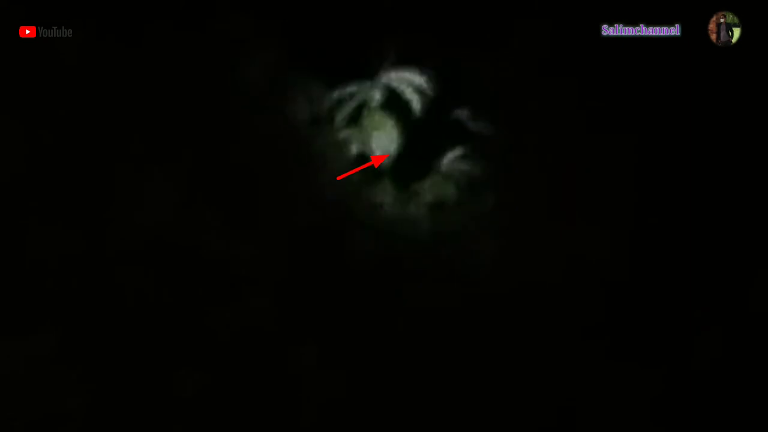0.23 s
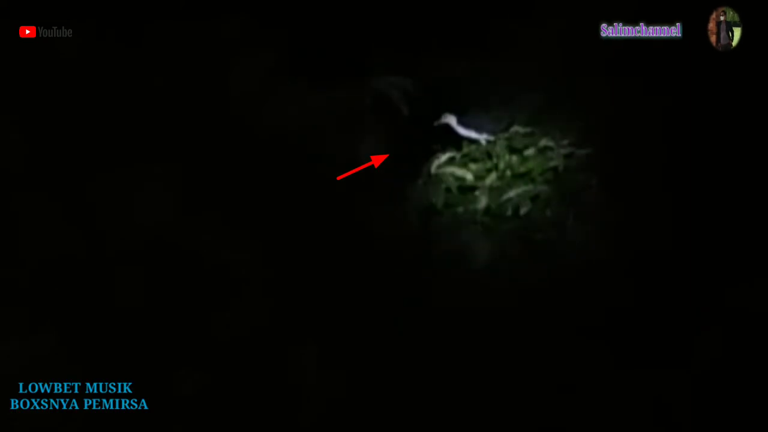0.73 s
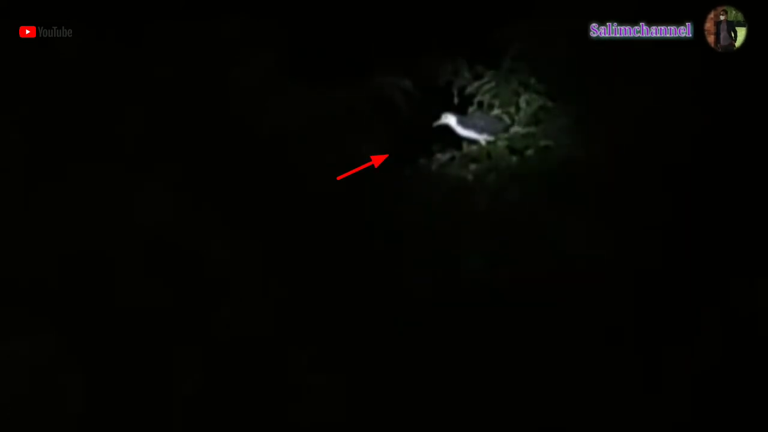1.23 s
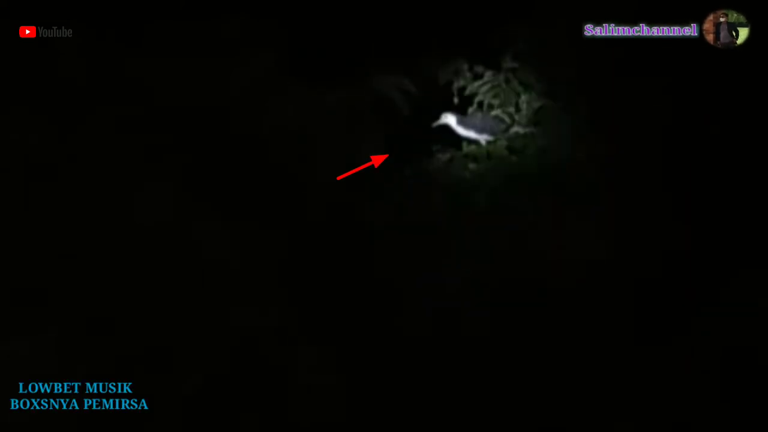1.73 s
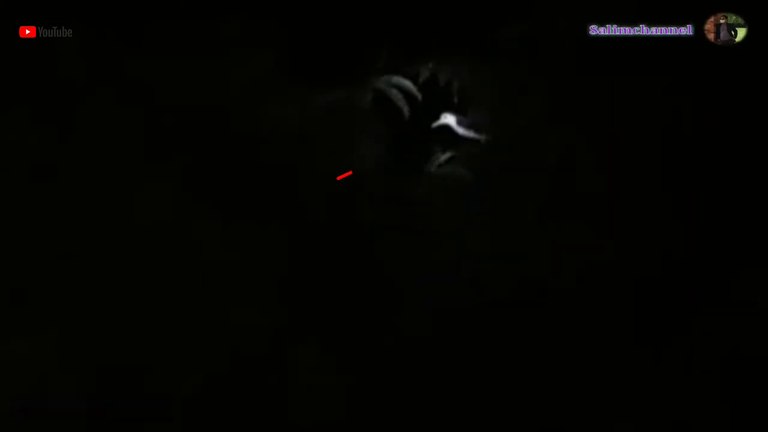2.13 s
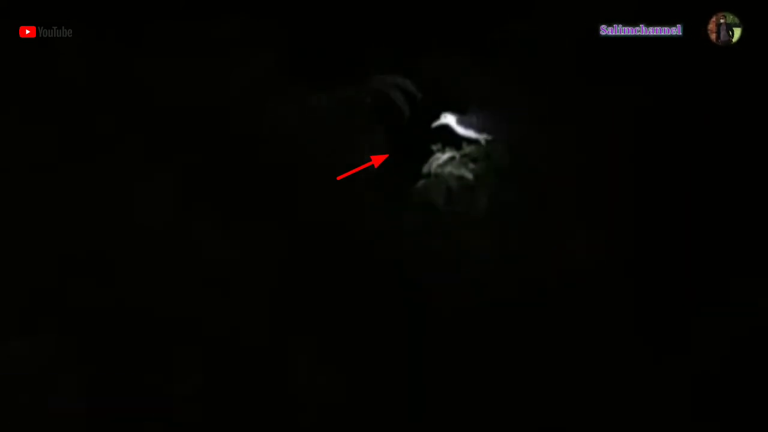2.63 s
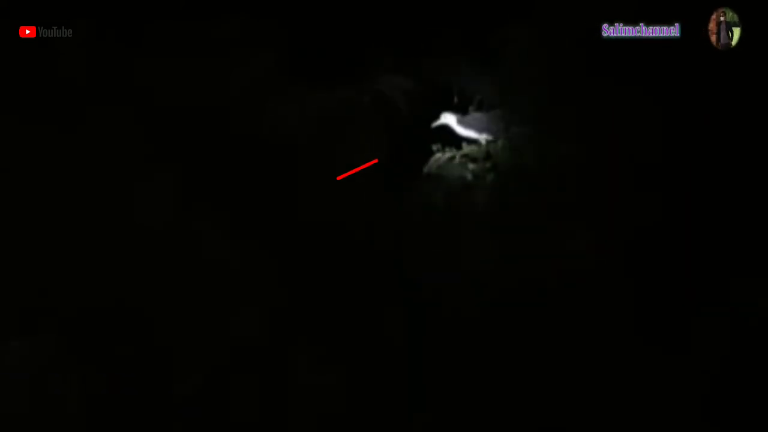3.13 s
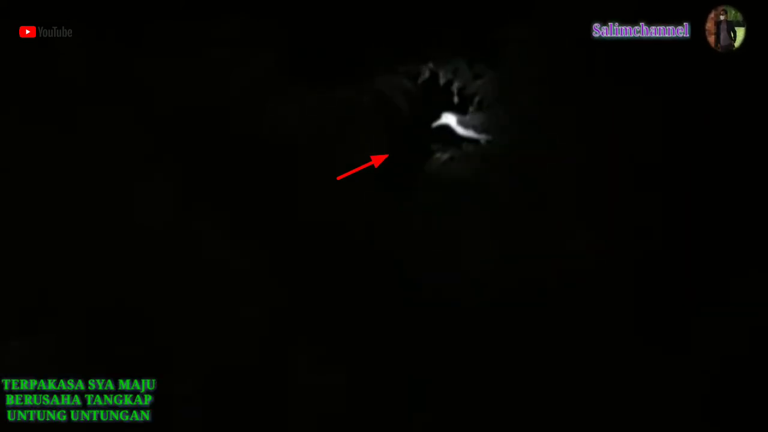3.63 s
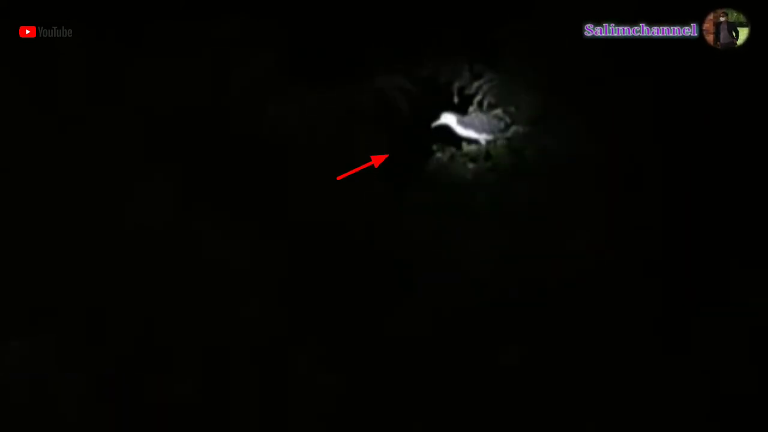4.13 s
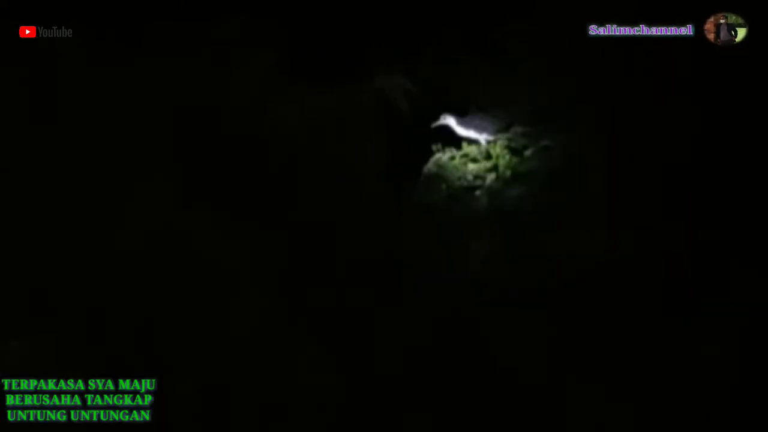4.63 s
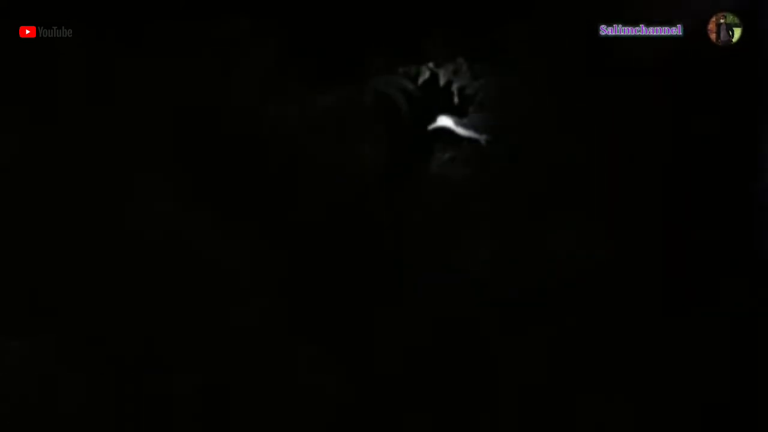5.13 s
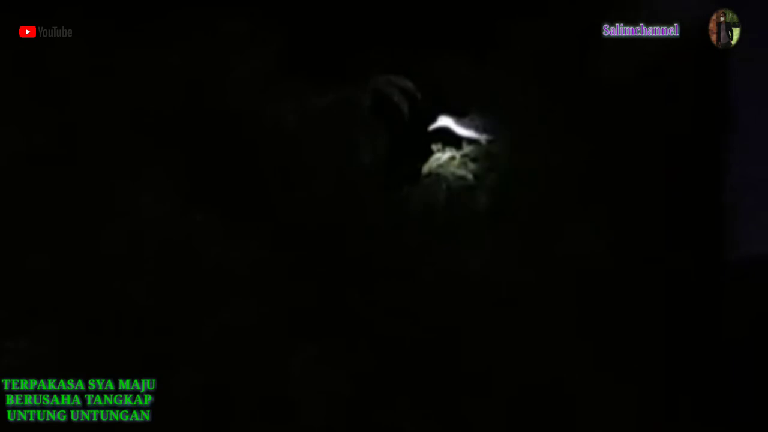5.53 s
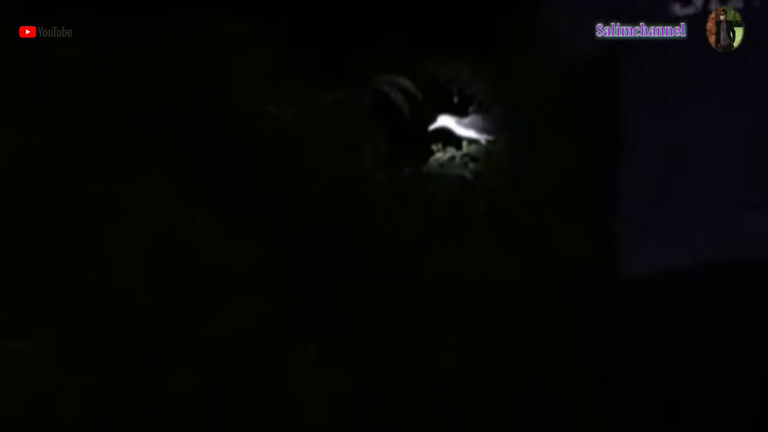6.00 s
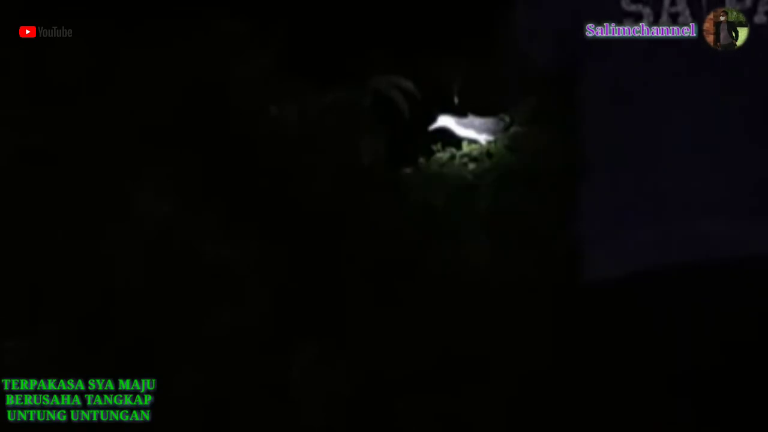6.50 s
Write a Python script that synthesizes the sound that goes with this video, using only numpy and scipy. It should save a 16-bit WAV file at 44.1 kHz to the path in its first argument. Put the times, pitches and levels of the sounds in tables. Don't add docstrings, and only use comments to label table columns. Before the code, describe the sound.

A night pond edge, heard through a coarse mono phone microphone. From 0 to 7 seconds, a dense shimmering chorus of distant insects, strongest around 6 kHz, sits over a deep, gently swelling traffic rumble and soft hiss. Tree crickets pulse quickly and unevenly; a thin katydid buzz sets in around 0.4. Close taps at 0.2 and 0.4, a dull knock at 1.5, and grainy cloth rubs occupy the first two seconds. A low cricket trills at 0.3; quick higher chirps run at 0.75-1.25 and 2.3-2.8, faintly again near 4.8-5.1. Slower chirps come at 1.5-2.1 and 6.4-6.6, mid-pitched trills at 0.7, 1.7, 3.4, 4.2 and 5.6, and farther chirps at 5.2-5.6. A distant engine rises at 0.8-1.7, 1.8-3.4 and, weaker, 3.8-5. A tiny fluttering squeak rises at 6.6.

```python
import sys
import numpy as np
from scipy import signal
from scipy.fft import rfft, irfft
from scipy.io import wavfile
from scipy.ndimage import uniform_filter1d

SR = 44100
rng = np.random.default_rng(int(sys.argv[2]) if len(sys.argv) > 2 else 0)


def unload_wav(signal):
    wavfile.write(
        sys.argv[1],
        SR,
        np.round(np.clip(np.atleast_2d(signal).T, -1, 1) * 32767).astype(np.int16),
    )


def voltage_ratio(level):
    return 10 ** (np.asarray(level, float) / 20)


N = 298116


def rms_one(x):
    return x / np.sqrt(np.mean(x ** 2) + 1e-20)


def drift(rate_hz):
    r = np.exp(-80 * np.pi * rate_hz / SR)
    slow = signal.lfilter([1], [1, -2 * r, r * r], rng.standard_normal(N // 40 + 2002))[2000:]
    return np.interp(np.arange(N) / 40, np.arange(len(slow)), rms_one(slow))


def coloured(x, spectrum):
    hz, db = np.transpose(spectrum)
    log_hz = np.log(np.maximum(np.fft.rfftfreq(N, 1 / SR), 1))
    gain = voltage_ratio(np.interp(log_hz, np.log(hz), db, left=-90, right=-90))
    return rms_one(irfft(rfft(x) * gain, N))


def stroke(start_hz, end_hz, length_s):
    part = np.linspace(0, 1, round(length_s * SR))
    hz = start_hz + (end_hz - start_hz) * part ** 1.25
    return np.sin(np.pi * part) ** 1.3 * np.sin(2 * np.pi * np.cumsum(hz) / SR)


def play(clicks, shape):
    return signal.oaconvolve(clicks, shape)[:N]


def foliage(x):
    t60_s = .12
    t = np.arange(SR // 2) / SR
    tail = rng.standard_normal(len(t)) * voltage_ratio(-60 * t / t60_s)
    return play(x, tail / np.sqrt(np.sum(tail ** 2)))


def far_chorus():
    # start pitch in Hz, end pitch in Hz, pitch spread in Hz, stroke length in seconds,
    # strokes per second, level in dB, throb in dB.
    crowds = [
        (3668, 3260, 140, .02, 250, -56.5, 1.5),
        (4874, 4350, 190, 0.013, 400, -61, 0),
        (5653, 5480, 55, 0.0091, 200, -52.5, -2.8),
        (6000, 5700, 130, 0.0104, 300, -48.5, 0.5),
        (6284, 6010, 75, .016, 250, -46, 0.5),
        (6560, 6300, 110, .012, 250, -52, -1),
        (6780, 6520, 30, 0.013, 300, -61.5, -1.5),
        (8424, 7900, 263, 0.0042, 900, -53.5, -0.5),
        (9360, 8530, 255, 0.0027, 650, -57.5, 0.4),
        (9660, 10350, 125, 0.0062, 500, -68, 1.7),
    ]
    out = np.zeros(N)
    for start_hz, end_hz, spread_hz, length_s, per_s, db, throb_db in crowds:
        crowd = np.zeros(N)
        for off in np.linspace(-1.6, 1.6, 5):
            gaps, sizes = rng.exponential(1, 8000), rng.standard_normal(8000)
            at = (np.cumsum(gaps) * SR / per_s).astype(int)
            clicks = np.bincount(at[at < N], sizes[at < N], N)
            voice = stroke(start_hz + off * spread_hz, end_hz + off * spread_hz, length_s)
            crowd += play(clicks, voice) * np.exp(-off ** 2 / 3)
        out += rms_one(crowd) * voltage_ratio(db + throb_db * drift(17))
    return out


def traffic():
    # time in seconds, level of the swell in dB.
    swell = [(0, -30), (.55, -31), (1.0, -29.5), (1.5, -26), (1.75, -29.5), (2.0, -28), (2.2, -30.5),
             (3.0, -29.5), (3.5, -34.5), (3.85, -27.5), (4.6, -27.5), (5.1, -30.5), (5.6, -29), (6.76, -27)]
    # frequency in Hz, density in dB per Hz.
    rumble = [(12, -35), (20, -20.5), (51, 4.5), (70, 7.5), (177, -11.5), (300, -20), (400, -28),
              (520, -36.5), (880, -120)]
    swell_db = np.interp(np.arange(N) / SR, *np.transpose(swell))
    roar = coloured(rng.standard_normal(N), rumble)
    deep = signal.sosfiltfilt(signal.butter(3, 110, fs=SR, output="sos"), roar)
    upper_db = -32 + 0.16 * (swell_db - swell_db.mean())
    return voltage_ratio(swell_db - 0.65) * rms_one(deep) + voltage_ratio(upper_db) * rms_one(roar - deep)


def air():
    # frequency in Hz, density in dB per Hz.
    hiss = [(200, 6), (400, -2), (800, 1), (1200, -3), (2000, -11), (3000, -13.5), (4200, -16.5),
            (7200, -15), (10200, -27), (11000, -25.5), (15500, -30.5)]
    return voltage_ratio(-44.5 + 0.92 * drift(0.8)) * coloured(rng.standard_normal(N), hiss)


def tree_chirps():
    # time in seconds, effort in dB.
    effort = [(0, -43.5), (.8, -47.5), (2.1, -46), (3.2, -48), (4.2, -44.5), (5.4, -47), (6.76, -49)]
    chirps_per_s, gap_s, uneven_s, uneven_db = 13.5, .022, .005, 2.5
    luck = rng.standard_normal((100, 2))
    s = np.arange(len(luck)) / chirps_per_s + .03 + uneven_s * luck[:, 0]
    db = np.interp(s, *np.transpose(effort)) + 3.5 + uneven_db * luck[:, 1]
    return [(t, gap_s, gap_s, d) for t, d in zip(s, db)]


def sing(phrases, shape, first_db, last_db, peak_at, uneven_db):
    pitch_uneven = .009
    song = np.zeros(N + 2 * SR)
    start_hz, end_hz, stroke_s = shape
    for s, length_s, gap_s, db in phrases:
        luck = rng.standard_normal((20, 3))
        k = np.arange(round(length_s / gap_s) + 1)
        swell_db = np.interp(k / k[-1], [0, peak_at, 1], [-first_db, 0, -last_db])
        times = s + gap_s * (k + .06 * luck[k, 0] * (k > 0))
        gains = voltage_ratio(db + swell_db + uneven_db * luck[k, 1])
        tunes = 1 + pitch_uneven * luck[k, 2]
        for at, gain, tune in zip(times, gains, tunes):
            one = gain * stroke(tune * start_hz, tune * end_hz, stroke_s)
            song[int(at * SR):][:len(one)] += one
    return song[:N]


def near_crickets():
    # start in seconds, length in seconds,
    # gap between strokes in seconds, peak level in dB.
    triller = [(.713, .27, 0.032, -41.5), (1.749, .23, 0.076, -39), (1.71, .23, .0725, -48),
               (2.045, .038, 0.042, -44.5), (3.352, .265, 0.043, -39), (3.667, .125, .0625, -46),
               (4.22, .38, 0.041, -40.5), (5.556, .2, 0.035, -41.5)]
    low_triller = [
        (0.302, .33, 0.03, -42),
        (0.673, .045, .044, -40),
    ]
    slow_chirper = [(1.502, .07, .034, -37), (1.69, .058, .029, -36.5), (1.871, .062, .031, -36),
                    (2.046, .066, 0.031, -38), (6.418, .066, .022, -40.5), (6.606, .04, .02, -38.5)]
    far_chirper = [
        (5.167, .072, 0.021, -43.5),
        (5.358, .066, 0.027, -41.5),
        (5.546, .057, 0.011, -46),
    ]
    # start in seconds, peak level in dB.
    fast_chirps = [(.746, -41), (.812, -38), (0.886, -38), (.961, -43), (1.022, -39), (1.09, -37.5),
                   (1.164, -36.5), (1.232, -37), (2.302, -36), (2.367, -35.5), (2.444, -42), (2.514, -40),
                   (2.583, -43), (2.659, -41.5), (2.722, -38), (2.792, -37.5), (4.8, -48), (4.87, -46),
                   (5.0, -45.5), (5.071, -51)]
    # start pitch in Hz, end pitch in Hz, stroke length in seconds.
    strokes = [
        (3690, 3290, .03),
        (3300, 2930, .027),
        (5200, 4500, .011),
        (5020, 4300, .016),
        (4900, 3980, .02),
        (6290, 6030, .017),
    ]
    # first stroke in dB under the peak, last stroke in dB under the peak,
    # place of the peak from 0 to 1, unevenness in dB.
    phrasing = [(7.0, 3.0, .65, 1.5), (5.0, 2.5, .4, 1.2), (1.0, 7.0, .4, 2.5), (3.0, 1.5, .6, 2.5),
                (7.0, 0.5, .75, 2.5), (3.0, 3.0, .45, 2.5)]
    echoes = [-12, -6, -6, -8, -10, -5]
    fast_chirper = [(s, .028, .014, db) for s, db in fast_chirps]
    singers = [triller, low_triller, fast_chirper, slow_chirper, far_chirper, tree_chirps()]
    direct, to_leaves = np.zeros(N), np.zeros(N)
    for phrases, manner, shape, echo_db in zip(singers, phrasing, strokes, echoes):
        song = sing(phrases, shape, *manner)
        direct += song
        to_leaves += voltage_ratio(echo_db) * song
    return direct + foliage(to_leaves)


def handling():
    # peak in seconds, swell in seconds, peak level in dB.
    rubs = [(.19, 0.09, -60), (0.449, .2, -59), (.55, .15, -65), (0.681, 0.088, -62.5), (0.951, 0.097, -66),
            (1.1, 0.21, -68), (1.23, 0.12, -63), (1.45, 0.21, -70), (1.555, .12, -56), (1.78, 0.09, -67),
            (1.87, 0.082, -70.5)]
    # frequency in Hz, density in dB per Hz.
    cloth = [(400, -4.5), (800, 9.5), (1500, 7), (3000, 10), (7000, 6.5), (10000, -1), (15500, -3)]
    # start in seconds, peak level in dB, ring in Hz, 60 dB decay in seconds.
    knocks = [
        (.166, -34.5, 2080, 0.13),
        (.17, -37, 1200, 0.16),
        (.415, -36.5, 1350, 0.066),
        (.448, -37, 6500, 0.012),
        (1.535, -33.5, 540, 0.13),
        (1.54, -36, 876, 0.089),
    ]
    grains = rng.standard_normal(N) * voltage_ratio(3.5 * drift(300))
    now = np.arange(N) / SR
    rub = np.zeros(N)
    for s, swell_s, db in rubs:
        rub += voltage_ratio(db + 13) * np.interp(now, [s - swell_s, s, s + 0.5 * swell_s], [0, 1, 0])
    out = rub * coloured(grains, cloth)
    t = np.arange(SR // 4) / SR
    for s, peak_db, hz, t60_s in knocks:
        scrape = rng.standard_normal(len(t)) * voltage_ratio(-60 * t / t60_s) * (1 - np.exp(-t / 0.0036))
        case = signal.butter(2, [hz / 1.2, hz * 1.25], "band", fs=SR, output="sos")
        ring = signal.sosfilt(case, scrape)
        out[round(s * SR):][:len(t)] += voltage_ratio(peak_db) * ring / np.abs(ring).max()
    return out


def katydid():
    wing = (9720, 9120, 0.0055)
    start_s, attack_s, strokes_per_s = 0.38, 0.24, 97
    sets_in = np.clip((np.arange(N) / SR - start_s) / attack_s, 0.1, 1)
    rate = strokes_per_s * (1 + .045 * drift(1.5) + .04 * drift(25))
    turns = np.floor(np.cumsum(rate) / SR)
    clicks = np.diff(turns, prepend=0) * voltage_ratio(rng.normal(0, 1.1, N)) * rng.choice([-1, 1], N)
    buzz = rms_one(play(clicks, stroke(*wing)))
    return sets_in * voltage_ratio(-59.5) * (buzz + voltage_ratio(-5.5) * foliage(buzz))


def engine():
    # start in seconds, end in seconds, start firing rate in Hz, end firing rate in Hz, peak in dB.
    pulls = [
        (0.798, 1.726, 54, 66.54, -29),
        (1.796, 3.404, 54.64, 63.26, -31),
        (3.848, 4.95, 52.9, 63.3, -33),
    ]
    # multiple of the firing rate, level in dB.
    orders = [(1, -1.5), (2, -1), (3, -5), (4, -13.5)]
    shift_dip_db = 14.5
    t, out = np.arange(N) / SR, np.zeros(N)
    waver = 1 + 0.0096 * drift(7.9)
    throbs = [2.8 * drift(3.3) for _ in orders]
    for start, end, start_hz, end_hz, db in pulls:
        part = np.clip((t - start) / (end - start), 0, 1)
        phase = 2 * np.pi * np.cumsum((start_hz + (end_hz - start_hz) * part) * waver) / SR
        load = voltage_ratio(db - shift_dip_db * (2 * part - 1) ** 2) * np.clip(20 * part * (1 - part), 0, 1)
        for (k, level_db), throb_db in zip(orders, throbs):
            out += load * voltage_ratio(level_db + throb_db) * np.sin(k * phase)
    return out


def squeak():
    s, start_hz, end_hz, length_s, db, flutter_hz = (6.572, 11400, 12900, .042, -55, 107)
    call = stroke(start_hz, end_hz, length_s)
    t = np.arange(len(call)) / SR
    call = call * (1 + 0.81 * np.sin(2 * np.pi * flutter_hz * t)) * (1 + 0.9 * drift(350)[:len(call)])
    out = np.zeros(N)
    out[round(s * SR):][:len(call)] = voltage_ratio(db) * call
    return out


def scene():
    insects = near_crickets() + far_chorus() + katydid() + squeak()
    return (insects + traffic() + engine() + air() + handling())[None, :]


def phone_rounding(x):
    # frequency in Hz, step in dB over the band's usual level.
    coarseness = [(300, -14), (1500, -3), (2950, 4.5), (3600, 4), (4100, 8.5), (4700, 6), (5200, 5),
                  (6400, -5), (7060, 7), (8400, -2), (9900, 1), (10450, 11.5), (10800, 8), (14900, 6),
                  (15700, 24)]
    # time in seconds, extra step in dB.
    thrift = [(0, 0), (1.8, 1), (3.2, 5), (6.76, 7.5)]
    size, width, wander_db = 1024, 16, 2.8
    n, k = np.arange(2 * size), np.arange(size)
    window = np.sin(np.pi * (n + .5) / (2 * size))
    basis = np.cos(np.pi / size * np.outer(n + .5 + size / 2, k + .5)) * window[:, None] * np.sqrt(2 / size)
    count = N // size + 2
    halves = np.pad(x, (size, count * size - N)).reshape(-1, size)
    lines = (np.hstack([halves[:-1], halves[1:]]) @ basis).reshape(count, -1, width)
    power = np.mean(lines ** 2, axis=2)
    usual = np.sqrt(np.median(power, axis=0)) + 1e-9
    now = np.sqrt(power) + 1e-9
    hz = (np.arange(size // width) + .5) * width * SR / (2 * size)
    valley = abs(hz - 7200) < 350
    chance = uniform_filter1d(rng.standard_normal(now.shape), size=2, axis=0) * np.sqrt(2)
    chance[:, valley] = chance[:, [np.argmin(abs(hz - 7200))]]
    step_db = np.interp(hz, *np.transpose(coarseness)) + wander_db * chance
    step_db += np.interp(np.arange(count) * size / SR, *np.transpose(thrift))[:, None] * valley
    step = (usual ** .6 * now ** .4 * voltage_ratio(step_db))[:, :, None]
    rounded = np.sign(lines) * np.floor(np.abs(lines) / step + .4) * step
    frames = rounded.reshape(count, size) @ basis.T
    return (frames[:-1, size:] + frames[1:, :size]).ravel()[:N]


def low_pass(x):
    return signal.sosfilt(signal.butter(12, 16130, fs=SR, output="sos"), x)


def record(dry):
    mix = phone_rounding(dry[0])[None, :]
    return low_pass(mix)


dry = scene()
out = record(dry)
unload_wav(out)
```